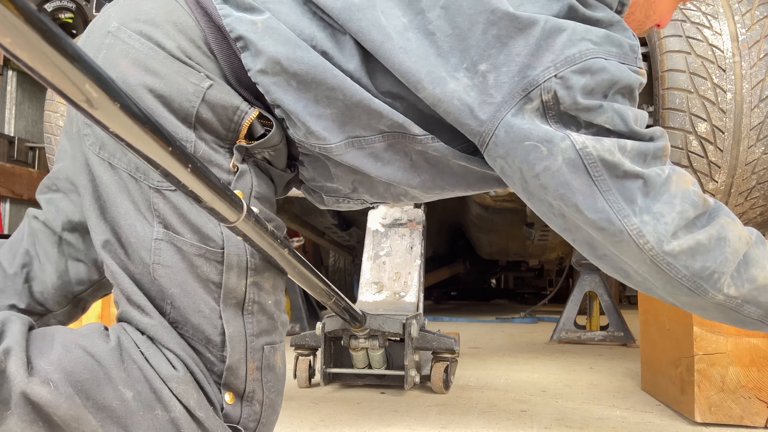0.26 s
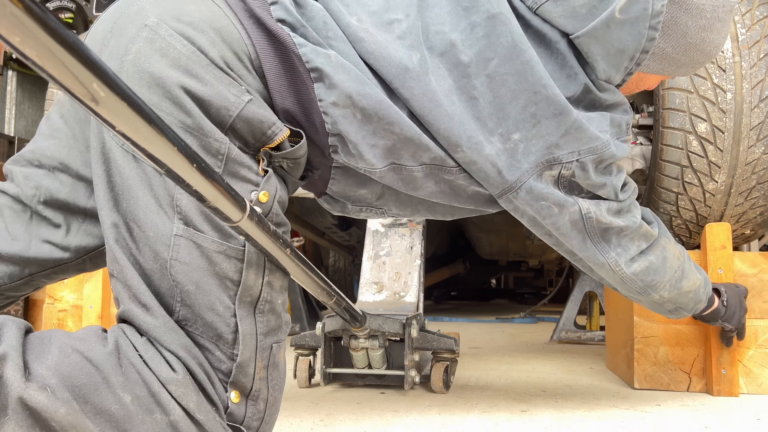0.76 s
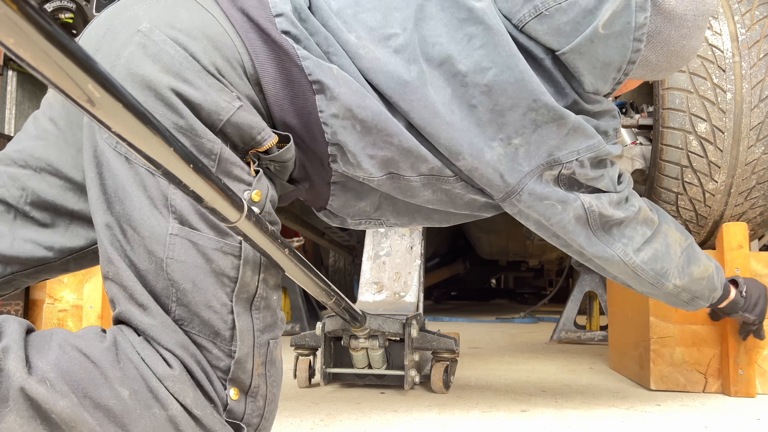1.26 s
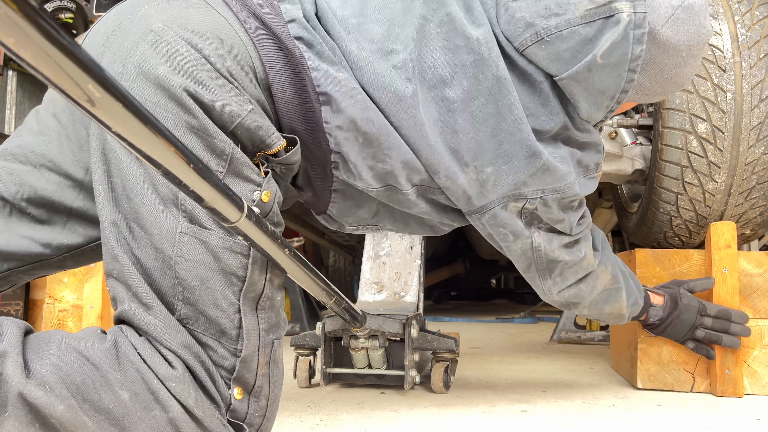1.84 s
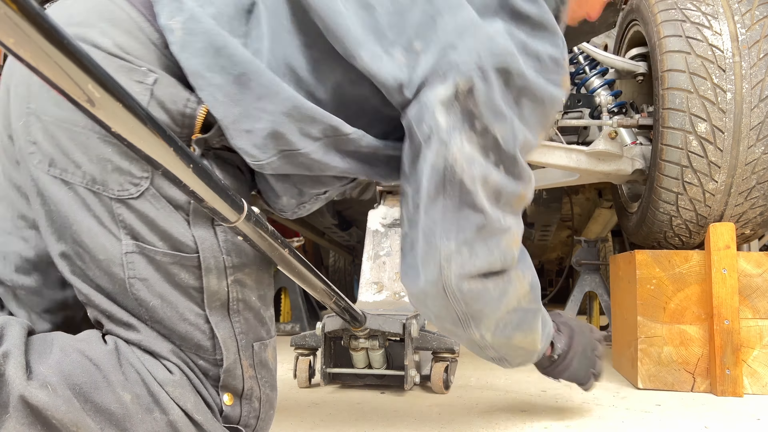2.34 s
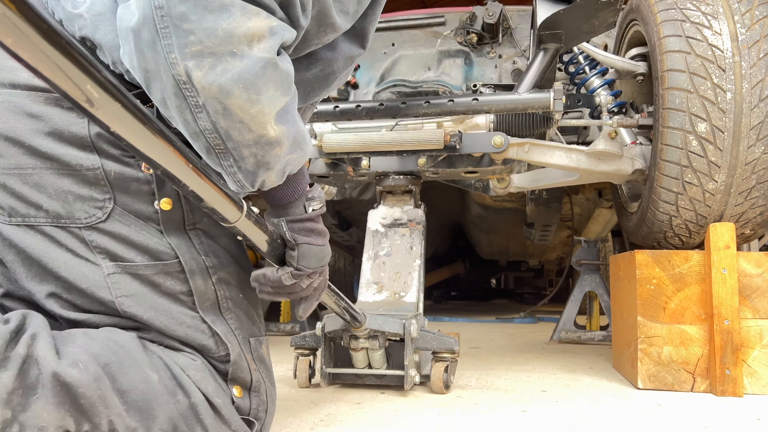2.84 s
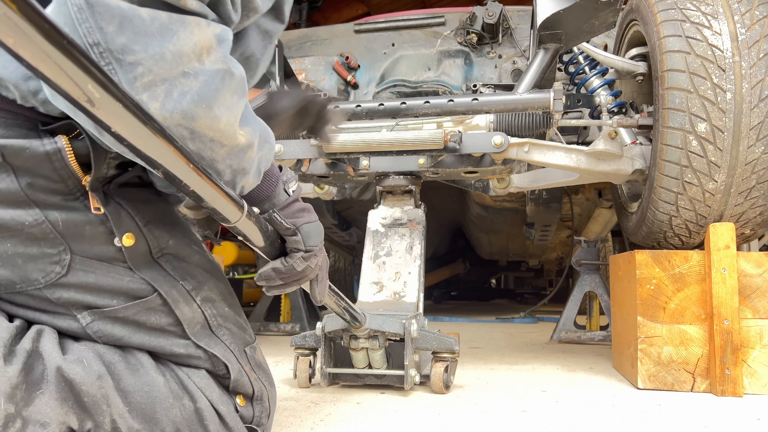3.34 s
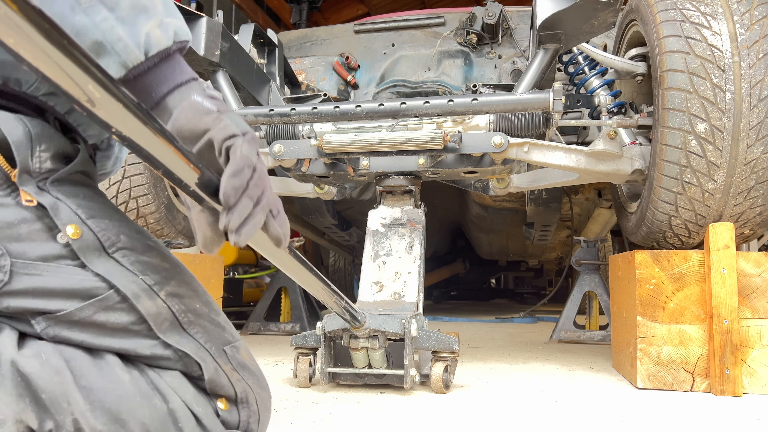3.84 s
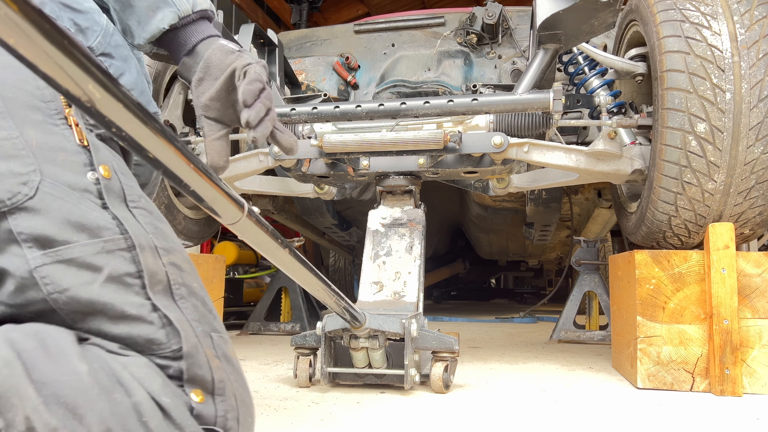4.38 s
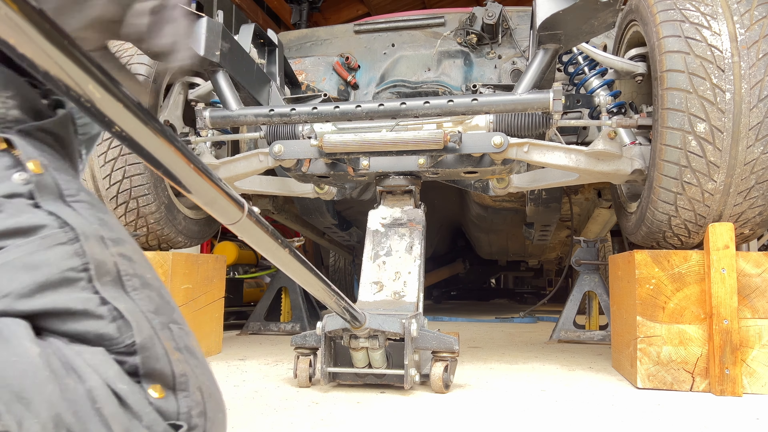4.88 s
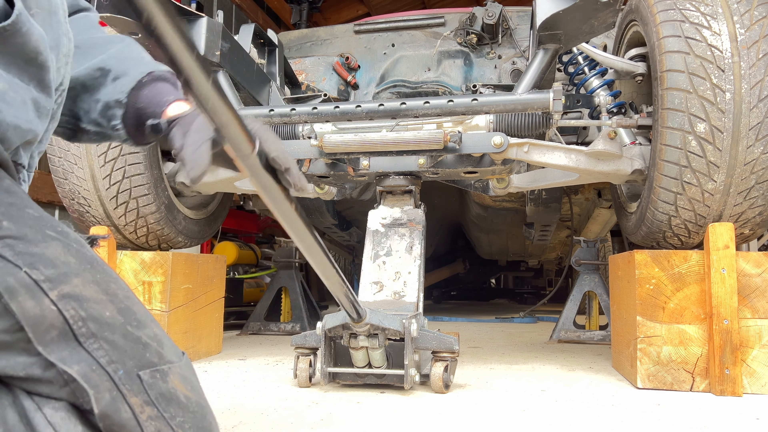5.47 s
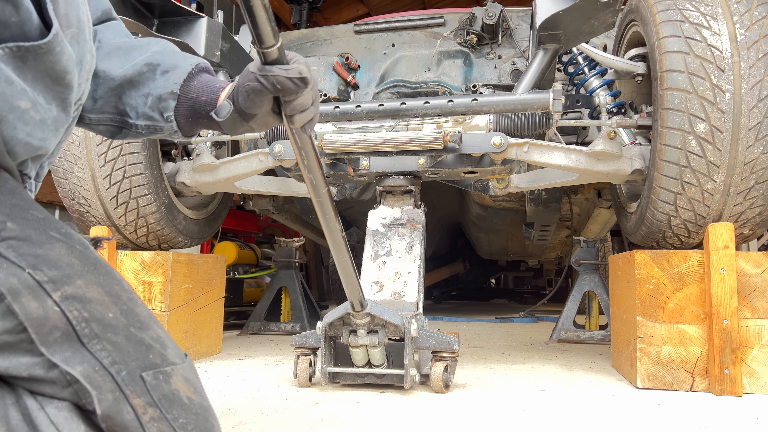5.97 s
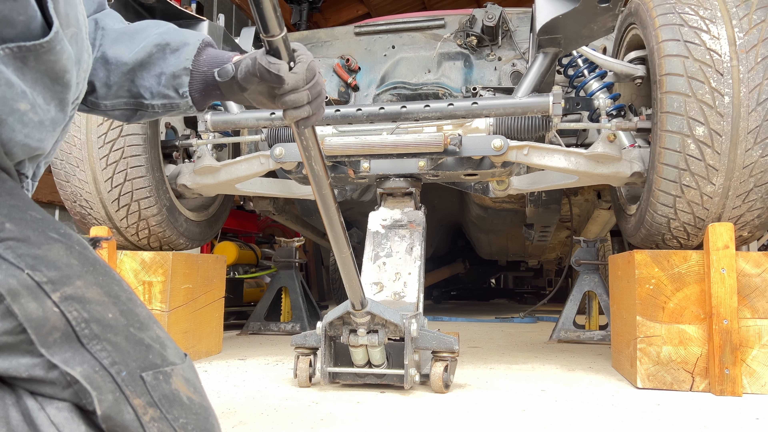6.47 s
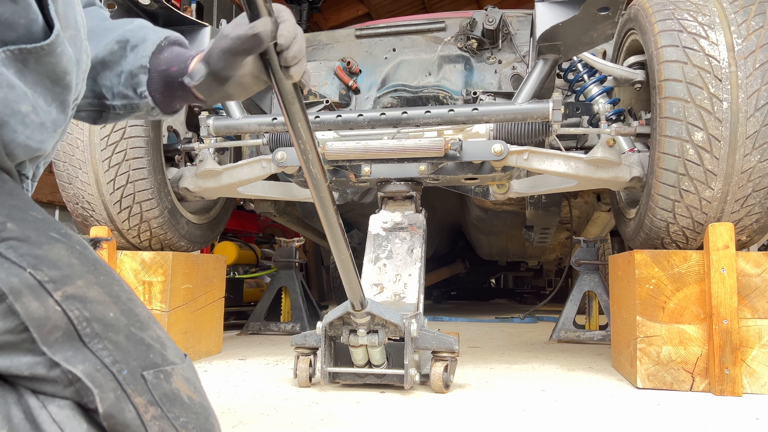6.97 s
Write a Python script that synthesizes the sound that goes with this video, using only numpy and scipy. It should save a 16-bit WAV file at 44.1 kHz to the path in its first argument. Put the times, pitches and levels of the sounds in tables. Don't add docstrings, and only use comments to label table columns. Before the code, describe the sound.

Close gritty scraping of heavy wood in short shoves with dry snaps, one solid knock, then quiet canvas rustling, soft thuds and metal ticks.

```python
import sys
import numpy as np
from scipy import signal
from scipy.fft import rfft, irfft, next_fast_len
from scipy.io import wavfile
from scipy.ndimage import map_coordinates

SR = 44100
rng = np.random.default_rng(int(sys.argv[2]) if len(sys.argv) > 2 else 0)


def unload_audio(sound):
    columns = np.transpose(np.atleast_2d(sound))
    steps = np.round(np.clip(columns, -1, 1) * 32767)
    wavfile.write(sys.argv[1], SR, steps.astype(np.int16))


def gain_from_db(level_db):
    decades = np.asarray(level_db, float) / 20
    return 10 ** decades


N = 318402

# start in seconds, peak level in dB, pitch in Hz,
# time to fall 60 dB in seconds, level of the upper knock in dB.
THUDS = [(0.27, -48, 63, 0.061, -1), (0.436, -26.5, 83.7, 0.11, -1.5), (0.872, -51, 410, 0.066, -3),
         (1.562, -40, 98.5, 0.1, -22), (1.005, -39, 84, 0.104, -25), (1.724, -39.5, 110.4, 0.092, -25),
         (1.836, -32.5, 96.9, 0.067, -3.5), (1.868, -38, 110.6, 0.11, -3), (2.167, -44, 184, 0.04, -13),
         (2.437, -39.5, 300, 0.029, -10.5), (2.4761, -12, 331, 0.022, -22.5),
         (2.489, -28.5, 213, 0.079, -13.5), (2.651, -45.5, 155, 0.08, -27), (3.13, -51, 190, 0.065, -20),
         (4.202, -33, 450, 0.026, -4.5), (4.21, -41, 120, 0.044, -5), (4.263, -39, 94.2, 0.045, -27),
         (4.684, -59, 91, 0.1, -19.5), (5.579, -38.5, 121, 0.062, -3), (5.798, -55, 423, 0.025, 9),
         (6.055, -45.5, 250, 0.062, -16), (5.813, -50.5, 101, 0.05, -17), (6.129, -50, 111, 0.036, -27),
         (6.394, -46.5, 764, 0.022, -24)]
# start in seconds, peak level in dB, pitch in Hz,
# left over right in dB.
SNAPS = [(0.379, -52.5, 2810, -2), (0.4324, -38, 2600, 5), (0.9682, -25, 9190, -1),
         (0.9906, -26.5, 8850, 0), (1.1124, -36, 5570, -3.5), (1.1368, -30.5, 5990, 1),
         (1.2087, -35, 2640, -5), (1.3039, -26, 9700, 0), (1.3349, -23, 6900, -3),
         (1.3987, -24.5, 11700, 1.5), (1.8372, -48, 2580, 2), (2.4733, -38.5, 7600, 5),
         (2.7711, -35.5, 5590, 8), (3.7823, -46, 2670, 3), (3.9823, -34.5, 4810, 0.5),
         (4.1096, -44, 2940, -4), (4.3131, -25, 3440, 1.5), (4.135, -45.5, 5000, 2),
         (4.3545, -35, 3510, 2.5), (4.4014, -26, 9500, 2), (5.3941, -49, 5560, -9),
         (5.5995, -33, 1500, 3.5), (5.6391, -27, 11900, 3), (5.9958, -38, 6170, 4),
         (5.938, -48.5, 3000, -3), (6.062, -43, 6000, 4), (6.434, -55, 5030, 4), (6.0402, -44.5, 5180, 4.5),
         (6.3205, -41, 5650, 4), (6.9945, -34.5, 5500, -6)]
# start in seconds, peak level in dB, left over right in dB.
CLINKS = [
    (0.9935, -28, -8),
    (5.3954, -37.5, 11),
    (6.9943, -32.5, 8.5),
]
# pitch in Hz, level in dB, time to fall 60 dB in seconds.
RINGS = [
    [(1310, 9, 0.031), (850, -9, 0.1), (2200, -8, 0.044)],
    [(1110, 1, 0.021), (1980, 4, 0.023), (2480, 6, 0.023), (3000, 3, 0.022), (5520, -0.5, .05)],
    [(1160, 2.5, 0.028), (2140, 7, 0.031), (2530, -2, 0.031), (3260, -4, 0.036), (5600, 0.5, 0.025)],
]
# start in seconds, length in seconds, level in dB.
SQUEAK = (4.424, 0.022, -46.5)
# pitch in Hz, level in dB.
SQUEAK_TONES = [(9700, 0), (12430, 5), (15150, 2)]
# pitch in Hz, width in Hz, level in dB.
WOOD_MODES = [(447, 15, -3), (678, 20, -8.5), (1297, 21, -9.5), (1850, 130, -11), (2360, 150, -11),
              (2570, 110, -7.5), (3630, 55, -27)]
# frequency in Hz, level in dB.
GRIT_COLOUR = [(1180, -19.5), (2000, -16), (8850, -5), (10200, -6.5), (11700, -8), (13500, -17.5),
               (14500, -9), (16000, -17.5)]
# frequency in Hz, level in dB.
FIBRE_COLOUR = [(1180, -24.5), (2000, -0.5), (3280, -8), (8550, -9), (11000, -14.5), (13500, -18.5),
                (15100, -14.5), (16000, -25.5)]
# frequency in Hz, level in dB.
FOLD_COLOUR = [(150, -43), (250, -4.5), (639, -4), (1060, -6), (1970, -9), (3280, -16.5), (3500, -19),
               (4550, -46), (7700, -120)]
# frequency in Hz, level in dB.
SLAB_COLOUR = [(12, -59), (20, -11), (86, 0), (153, -1), (214, -9.5), (325, -8), (380, -15), (450, -8),
               (580, -36.5), (990, -120)]
# frequency in Hz, level in dB.
KNEE_COLOUR = [(12, -37.5), (20, -11), (71, -2), (172, -2), (209, -3), (260, -4.5), (450, -11.5),
               (580, -43), (990, -120)]
# frequency in Hz, level in dB.
AIR_COLOUR = [(15, -33.5), (70, 6), (161, -6), (1300, -15), (2100, -8), (2900, -28), (9000, -26.5),
              (16000, -43)]
# frequency in Hz, likeness from 0 to 1.
LIKENESS = [(60, .99), (180, 0.99), (550, 0.79), (1650, 0.37), (4970, 0.43), (15000, 0.26)]
# frequency in Hz, time to fall 60 dB in seconds.
ROOM_DECAY = [(100, 0.17), (1000, 0.096), (10000, 0.062)]
# start in seconds, length in seconds, wood level in dB,
# grit over wood in dB, slab over wood in dB.
HAUL = [
    (.381, .405, -33, -9, -2),
]
# start in seconds, length in seconds, wood level in dB,
# grit over wood in dB, slab over wood in dB.
SHOVES = [
    (0, 0.061, -62.5, -6, 4),
    (.148, 0.077, -47.5, -5.5, 3),
    (.955, 0.057, -40.5, -7, 0),
    (1.111, 0.038, -47.5, -1.5, -5.5),
    (1.204, 0.069, -39.5, -10, -4.5),
    (1.301, .11, -41.5, -6, 1),
    (1.508, 0.046, -45.5, -10, -3),
    (1.625, 0.055, -61.5, 1, -23),
    (1.836, 0.075, -41, -9.5, 0),
]
# start in seconds, length in seconds, fold level in dB,
# fibre over fold in dB, weight over fold in dB.
TUGS = [(2.762, 0.1, -51, -0.5, -2), (3.068, 0.034, -68, 9, -18), (3.778, 0.038, -54.5, -3.5, 1),
        (3.875, .015, -65.5, 4, -11), (3.978, 0.066, -47.5, -4, -5), (4.105, 0.028, -54.5, -1, -1.5),
        (4.2, 0.05, -45, -16.5, 0), (4.868, 0.1, -60.5, -5, 4), (5.065, 0.14, -48.5, -2, -3.5),
        (5.39, 0.03, -45, -21, 0), (5.574, 0.023, -49, -17, 6), (5.665, 0.05, -58, -2.5, 5),
        (5.85, 0.035, -59, -17, 5.5), (6.038, 0.049, -57, -8, 7), (6.318, 0.04, -62.5, -2.5, -9),
        (6.635, 0.024, -72.5, 4, -1), (6.985, 0.061, -43, -5, -1), (7.05, 0.087, -51.5, -2, -4)]
# start in seconds, length in seconds, fold level in dB,
# fibre over fold in dB, weight over fold in dB.
STRETCHES = [(2.25, 0.068, -64, -11, -13), (2.9, 0.079, -60, 0, 6), (2.655, .09, -74.5, -11, 17),
             (3.11, 0.03, -68, 0, 14.5), (3.42, 0.097, -63, 2, -5), (3.62, .06, -56, -1.5, -15),
             (4.215, 0.038, -53.5, -1, 1), (4.31, 0.14, -48, 0.5, 2), (4.9, 0.15, -66.5, -0.5, -1),
             (5.33, 0.068, -58.5, -4.5, -10), (5.595, 0.034, -51.5, -1, -1),
             (5.92, 0.095, -57.5, -7.5, 3.5), (6.35, 0.044, -62.5, -2, 5.5), (6.68, 0.081, -62.5, -3, -0.5),
             (6.94, .028, -54, 2.5, -1), (7.17, 0.067, -63, -14, 3)]
CATCH_S = .008
# attack in seconds, level at the start in dB, share of the length at which
# it peaks, level at the end in dB, release in seconds.
HAUL_SHAPE = (CATCH_S, -17, 0.46, -13.5, 0.035)
SHOVE_SHAPE = (CATCH_S, -4, 0.53, -4.5, 0.079)
TUG_SHAPE = (0.0046, -6, 0.0628, -11.5, 0.15)
STRETCH_SHAPE = (0.05, -11.5, 0.6361, -4, 0.0673)
# time in seconds, level of the stirring in dB.
STIR = [(0, -68), (.9, -65), (1.8, -69.5), (1.97, -88.5), (2.2, -68.5), (2.75, -63.5), (3.03, -80.5),
        (3.25, -64), (3.6, -68), (4.4, -67.5), (4.52, -76.5), (4.85, -71.5), (5.45, -65), (5.8, -75),
        (6.28, -76), (6.5, -92.5), (6.88, -81), (7.22, -75)]
# start in seconds, length in seconds, level in dB, pitch in Hz.
CHATTER = [
    (0.497, .23, -39, 800),
    (0.512, .14, -39.5, 1320),
    (0.95, 0.046, -42, 1390),
    (1.208, 0.064, -39.5, 850),
    (1.295, .1, -39.5, 1530),
    (1.512, 0.04, -50.5, 1710),
    (1.828, 0.036, -49, 776),
    (7.188, 0.045, -58, 750),
]
# centre in Hz, half width in Hz, level in dB.
DEAD_BANDS = [(10225, 430, -18.5), (13700, 850, -33.5)]

BLOCK_PAN_DB, CLOTH_PAN_DB = -0.5, 3
BLOCK_LEAD, CLOTH_LEAD = -7, 10


def unit(x):
    return x / np.sqrt(np.mean(x ** 2) + 1e-20)


def along(points, hz):
    f, v = np.transpose(points)
    return np.interp(np.log(hz + 1), np.log(f + 1), v)


def curves(rows):
    s, *cols = np.transpose(rows)
    return [np.interp(np.arange(N) / SR, s, c) for c in cols]


def wobble(rate):
    knots = rng.standard_normal(int(N * rate / SR) + 4)
    return map_coordinates(knots, [np.arange(N) * rate / SR])


def filtered(x, response):
    m = next_fast_len(N + SR // 2)
    return irfft(rfft(x, m) * response(np.fft.rfftfreq(m, 1 / SR)), m)[..., :N]


def coloured(spectrum):
    return lambda hz: gain_from_db(along(spectrum, hz))


def panned(x, db, lead=0):
    left, right = x * np.array([[gain_from_db(db / 2)], [gain_from_db(-db / 2)]])
    return np.array([left, np.roll(right, lead)])


def add(track, s, sound):
    part = track[:, round(s * SR):][:, :sound.shape[1]]
    part += sound[:, :part.shape[1]]


def rub(gain, slips):
    def turn(hz):
        return np.arccos(np.clip(along(LIKENESS, hz), -1, 1)) / 2

    pair = rng.standard_normal((2, N)) * slips
    mid, side = filtered(pair, lambda hz: gain(hz) * [np.cos(turn(hz)), np.sin(turn(hz))])
    return unit(np.array([mid + side, mid - side]))


def ring(hz, t60, rise, t):
    return np.sin(2 * np.pi * hz * t) * gain_from_db(-60 * t / t60) * (1 - np.exp(-t / rise))


def strokes(rows, shape):
    attack, first_db, top, last_db, release = shape
    early = SR // 10
    t = np.arange(-early, SR) / SR
    gains = np.zeros((3, N + 2 * SR))
    tails = (release, release, 1.26 * release)
    for s, length, db, fine_db, low_db in rows:
        for gain, over_db, tail in zip(gains, (0, fine_db, low_db), tails):
            times = np.cumsum([-attack, attack, top * length, (1 - top) * length, tail, tail])
            levels = [-40, first_db, 0, last_db, last_db - 50, -99]
            gain[round(s * SR):][:len(t)] += gain_from_db(db + over_db + np.interp(t, times, levels, -99))
    return gains[:, early:][:, :N]


def still_air():
    return gain_from_db(-68.5 - 5.5) * rub(coloured(AIR_COLOUR), gain_from_db(1.2 * wobble(1.5)))


def garage(x):
    hz, t, z = signal.stft(rng.standard_normal((2, SR // 2)), SR, nperseg=256)
    fading = z * gain_from_db(-60 * t / along(ROOM_DECAY, hz)[:, None])
    tail = signal.istft(fading, SR, nperseg=256)[1]
    tail = tail / np.linalg.norm(tail[0])
    delayed = np.pad(x, ((0, 0), (200, 0)))
    return signal.fftconvolve(delayed, tail, axes=1)[:, :N]


def cloth():
    over_fold_db = np.array([[0], [-4.5], [2]])
    stir = gain_from_db(curves(STIR) + over_fold_db)
    gains = stir + strokes(TUGS, TUG_SHAPE) + strokes(STRETCHES, STRETCH_SHAPE)
    fold_gain, fibre_gain, weight_gain = gains
    clump = wobble(55)
    fold = fold_gain * rub(coloured(FOLD_COLOUR), gain_from_db(1.53 * clump + 2.43 * wobble(200)))
    fibre = gain_from_db(3) * fibre_gain * rub(coloured(FIBRE_COLOUR), gain_from_db(2.0 * clump + 1.94 * wobble(700)))
    weight = weight_gain * rub(coloured(KNEE_COLOUR), gain_from_db(0.92 * clump + 3.34 * wobble(30)))
    return panned(fold + fibre, CLOTH_PAN_DB, CLOTH_LEAD) + weight


def snaps():
    out = np.zeros((2, N))
    t = np.arange(SR // 40) / SR
    for s, db, hz, pan_db in SNAPS:
        noise = rng.standard_normal((2, len(t)))
        splinter = signal.lfilter([1, -.6], 1, noise) * gain_from_db(-60 * t / 0.03)
        spike = ring(hz, 0.0028, .00005, t)
        add(out, s, panned(gain_from_db(db) * (spike + 0.34 * splinter), pan_db))
    return out


def thuds():
    out = np.zeros((2, N))
    t = np.arange(SR // 4) / SR
    for s, db, hz, t60, knock_db in THUDS:
        swing = ring(hz, t60, 0.00082, t)
        swing = swing + gain_from_db(-11) * ring(0.608 * hz, 2.4 * t60, 0.009, t)
        puff = signal.lfilter([.2], [1, -.85], rng.standard_normal(len(t)))
        puff = puff * gain_from_db(-60 * t / (.5 * t60))
        knock = 0.64 * puff + ring(2.4 * hz, 0.68 * t60, 0.0011, t)
        knock = knock + gain_from_db(-11) * ring(3.7 * hz, 0.5 * t60, 0.0022, t)
        add(out, s, panned(gain_from_db(db + 4.0) * (swing + gain_from_db(knock_db) * knock), -.6))
    return out


def handle():
    out = np.zeros((2, N))
    t = np.arange(SR // 5) / SR
    for (s, db, pan_db), modes in zip(CLINKS, RINGS):
        steel = sum(gain_from_db(level) * ring(hz, t60, 0.00018, t) for hz, level, t60 in modes)
        crack = signal.lfilter([.4], [1, -.6], rng.standard_normal(len(t)))
        crack = 0.92 * crack * gain_from_db(-60 * t / 0.032)
        add(out, s, panned(gain_from_db(db - 5.5) * (steel + crack), pan_db))
    return out


def zip_squeak():
    out = np.zeros((2, N))
    t = np.arange(SR // 5) / SR
    s, length, db = SQUEAK
    swell = np.sin(np.pi * np.clip(t / length, 0, 1))
    tones = sum(gain_from_db(level) * np.sin(2 * np.pi * hz * t) for hz, level in SQUEAK_TONES)
    add(out, s, panned(gain_from_db(db) * swell * tones, 1.5))
    return out


def chatter():
    out = np.zeros((2, N))
    a, b = rng.standard_normal((2, N)) * gain_from_db(3.5 * wobble(150))
    for s, length, db, hz in CHATTER:
        peak = signal.iirpeak(hz, 1 / .3, SR)
        ringing = signal.lfilter(*peak, [a + 0.34 * b, a - 0.45 * b])
        ringing = signal.lfilter(*peak, ringing)
        out += strokes([(s, length, db, 0, 0)], SHOVE_SHAPE)[0] * unit(ringing)
    return panned(out, BLOCK_PAN_DB, BLOCK_LEAD)


def wood_body(f):
    modes = 0
    for k, (centre, width, db) in enumerate(WOOD_MODES):
        modes = modes + (-1) ** k * gain_from_db(db) * 1j * f * width / (centre ** 2 - f * f + 1j * f * width)
    hum = gain_from_db(0.5) / (1 + (f / 2200) ** 2)
    bass_loss = 1 + (330 / (f + 1)) ** 4
    return (np.abs(modes) + hum) / bass_loss


def drag():
    wood_gain, grit_gain, slab_gain = strokes(HAUL, HAUL_SHAPE) + strokes(SHOVES, SHOVE_SHAPE)
    catch = wobble(60.1)
    wood = wood_gain * rub(wood_body, gain_from_db(1.1 * catch + 1.96 * wobble(300)))
    grit = grit_gain * rub(coloured(GRIT_COLOUR), gain_from_db(2.4 * catch + 2.6 * wobble(900)))
    slab = slab_gain * rub(coloured(SLAB_COLOUR), gain_from_db(1.6 * catch + 4.4 * wobble(18)))
    return panned(wood + grit + slab, BLOCK_PAN_DB, BLOCK_LEAD)


def scene():
    hits = snaps() + thuds() + handle() + zip_squeak()
    rubs = cloth() + chatter() + drag()
    echo = garage(gain_from_db(-12.5) * hits + gain_from_db(-15.5) * rubs)
    return still_air() + echo + hits + rubs


def low_pass(x):
    return signal.sosfilt(signal.butter(12, 17090, fs=SR, output="sos"), x)


def record(dry):
    def colour_db(hz):
        dips = sum(db * np.exp(-((hz - centre) / half) ** 4) for centre, half, db in DEAD_BANDS)
        return dips - 30 * (hz > 15900)

    mix = filtered(dry, lambda hz: gain_from_db(colour_db(hz)))
    return low_pass(mix)


dry = scene()
out = record(dry)
unload_audio(out)
```